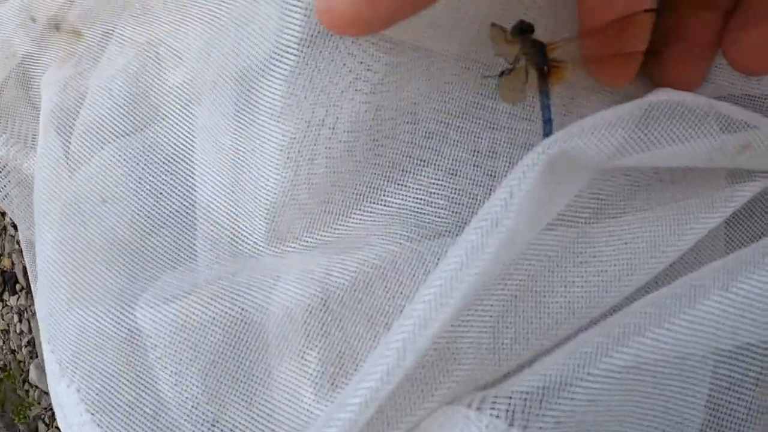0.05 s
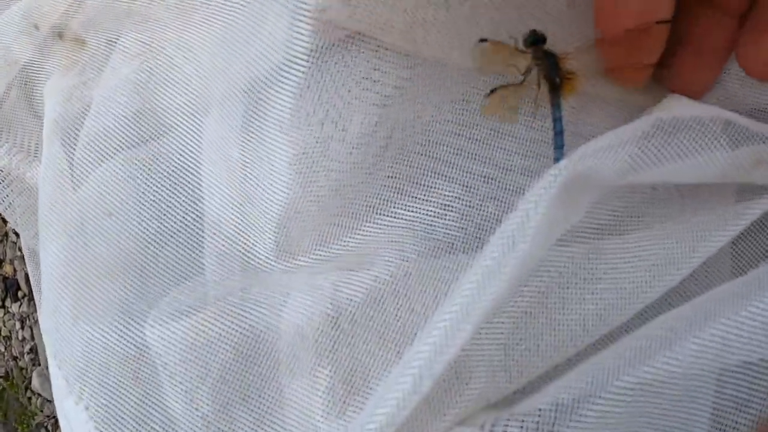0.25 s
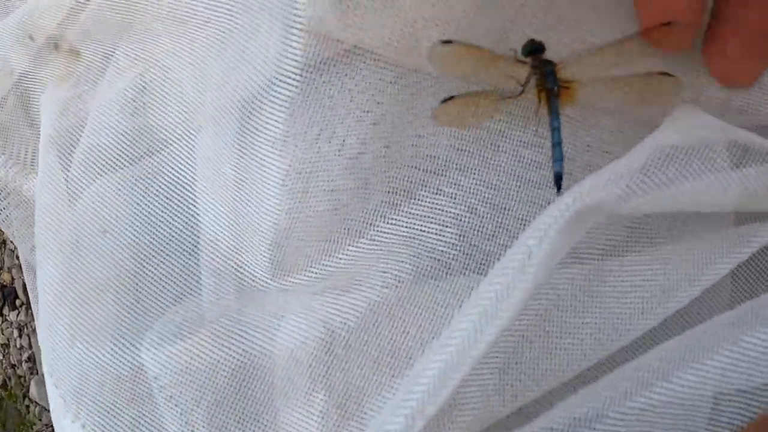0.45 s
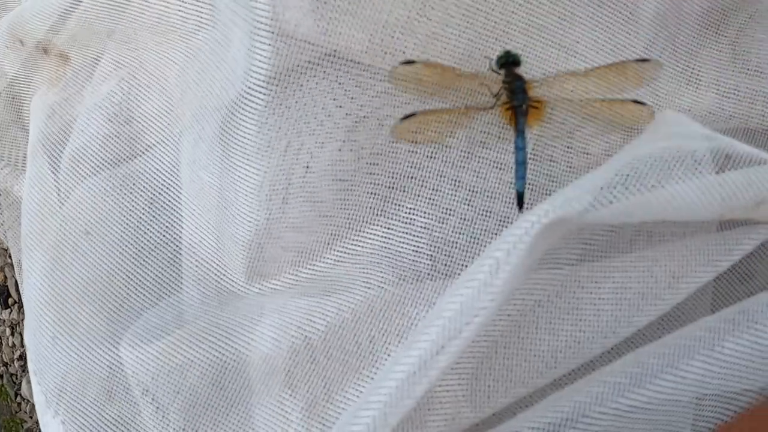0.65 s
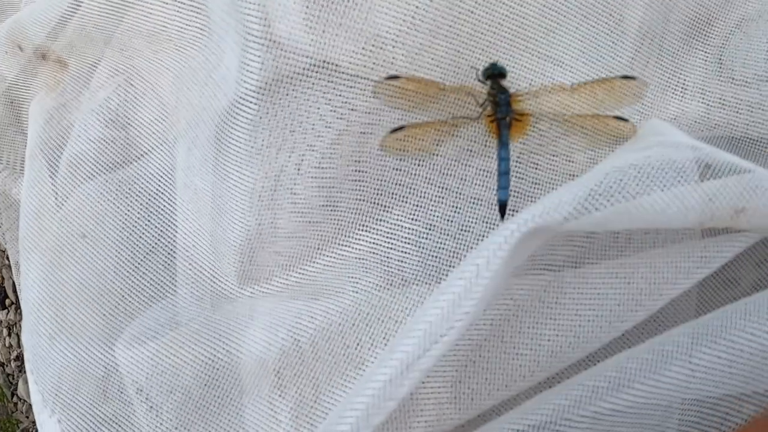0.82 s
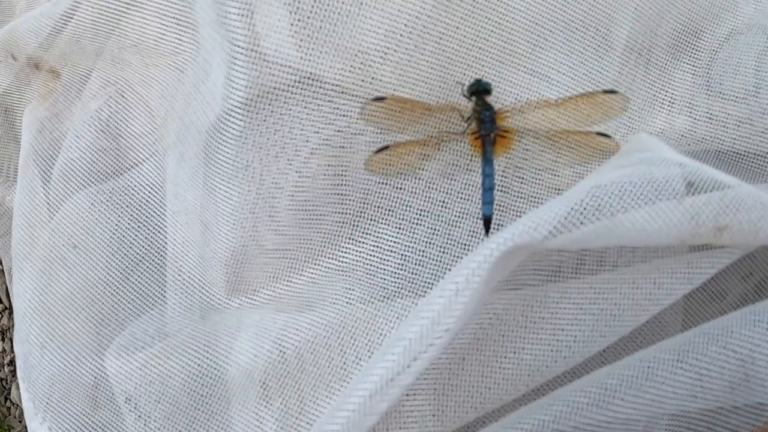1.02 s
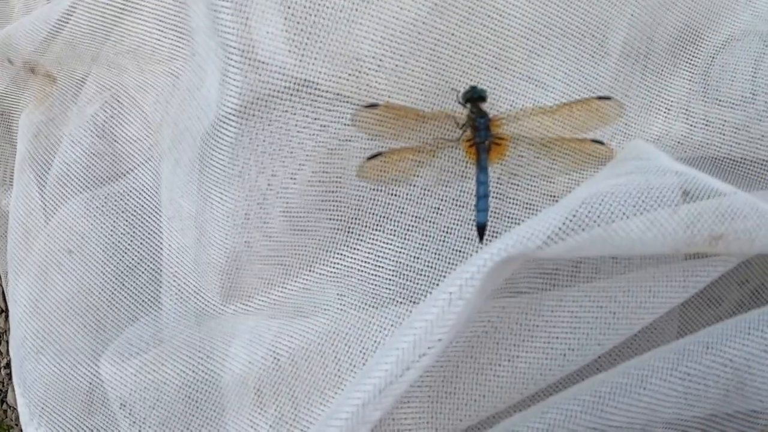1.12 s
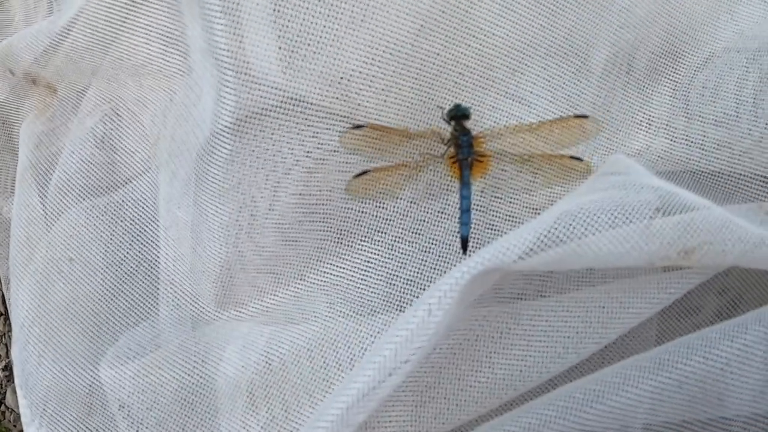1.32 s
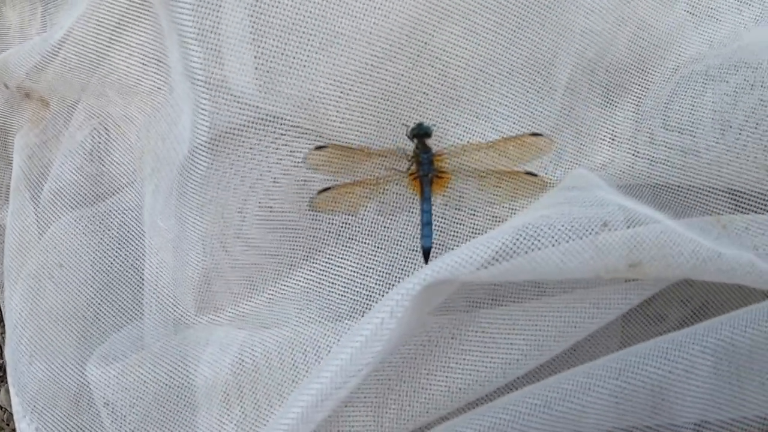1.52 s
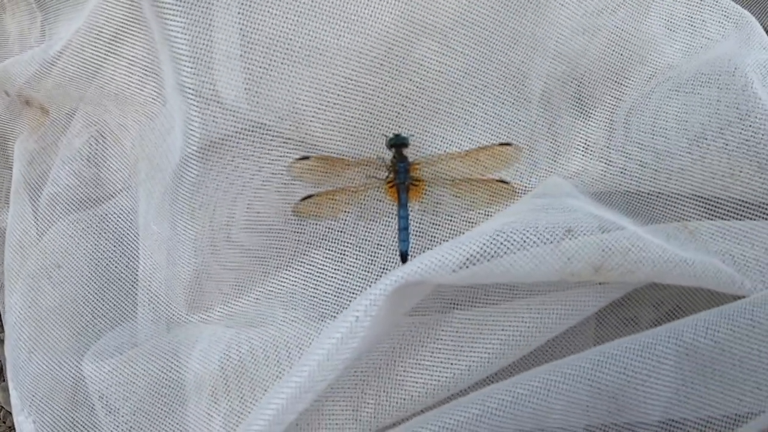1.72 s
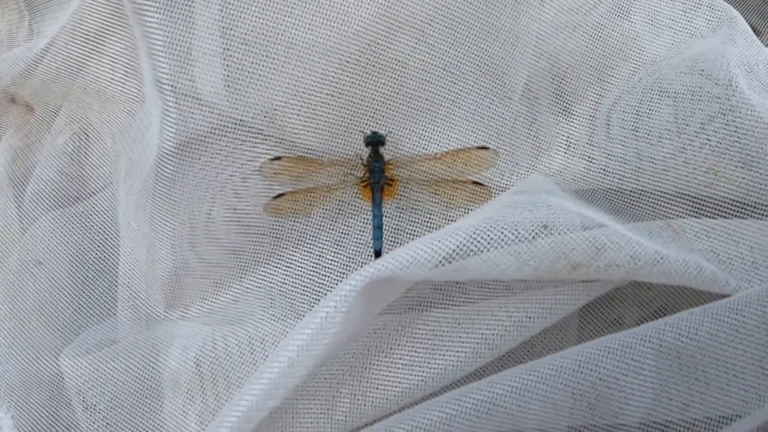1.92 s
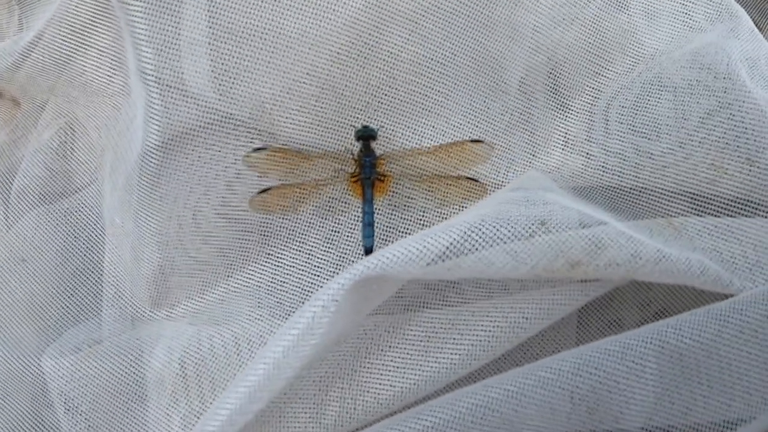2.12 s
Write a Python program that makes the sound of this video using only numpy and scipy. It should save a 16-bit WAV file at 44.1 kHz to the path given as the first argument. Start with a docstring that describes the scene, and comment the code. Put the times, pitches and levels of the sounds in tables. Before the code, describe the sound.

Uneven wind gusts buffet the microphone with a low rumble. Close by, a dragonfly's wings snap and scrape briefly on netting, followed by a few light ticks and a soft creak of the net, with faint outdoor hiss behind.

```python
"""A dragonfly on a mesh net outdoors, close to the camera's stereo microphone. Let go, it gives four
dry wingbeats left of centre, each a snap, a flap of the mesh and a scrape. Gusts rumble and thump
right on the two microphone ports; the held net rustles, ticks and creaks faintly, close by.
Far behind lies a quiet outdoor hiss with two faint falling whistles, perhaps a bird."""
import sys
import numpy as np
from scipy.fft import rfft, irfft, next_fast_len
from scipy.io import wavfile
from scipy.ndimage import uniform_filter1d

SR = 44100
rng = np.random.default_rng(int(sys.argv[2]) if len(sys.argv) > 2 else 0)


def wav_record(signal):
    """Record a signal, one row per channel, as 16-bit PCM in the file named by sys.argv[1]."""
    frames = np.transpose(np.atleast_2d(signal))
    bounded = np.clip(frames, -1, 1)
    # unit amplitude maps onto the largest positive 16-bit level
    quanta = np.round(bounded * 32767).astype(np.int16)
    wavfile.write(sys.argv[1], SR, quanta)


N = 94815

# distant outdoor hiss: time_s, relative_level_db
HISS_LEVELS = [(0.0, -64.5), (1.05, -68), (1.34, -67.5), (1.72, -66), (2.07, -67.5), (2.15, -68)]
# its spectrum: frequency_hz, gain_db
HISS_SPECTRUM = [(100, 14), (300, 10), (500, 8.5), (800, -2), (1200, 2.5), (1700, -3.5), (2400, -5.5),
                 (3100, -4.5), (3700, -7), (4600, -3.5), (5600, -8.5), (7000, -14), (9000, -22),
                 (12000, -34), (15000, -34.5)]
# how alike it is at the two ports: frequency_hz, correlation
HISS_LIKENESS = [(200, 0.14), (600, 0.96), (1200, 0.67), (2500, 0.58), (5000, 0.12), (10000, 0.14)]

# gusts on each microphone port: time_s, relative_rumble_db, relative_eddy_db
LEFT_GUSTS = [(0,-36,-57), (.12,-50,-50), (.27,-31,-48), (.31,-24.5,-36), (.345,-24,-30.5), (.38,-31,-40.5),
              (.45,-20,-32), (.54,-21.5,-32), (.59,-31.5,-49), (.73,-24.5,-37), (.8,-31.5,-54.5),
              (.97,-34,-57), (1.03,-13,-18.5), (1.09,-31,-48), (1.22,-46,-57), (1.36,-40.5,-58),
              (1.45,-31.5,-47), (1.52,-36,-49), (1.62,-40,-50), (1.68,-19,-41.5), (1.73,-42,-60.5),
              (1.86,-40.5,-50), (2.15,-49,-50.5)]
RIGHT_GUSTS = [(0, -46, -53), (0.14, -47.5, -50), (0.27, -35.5, -46.5), (0.33, -40, -28), (0.4, -26, -36),
               (0.47, -32, -28), (0.6, -22, -33), (0.73, -27, -36), (0.81, -31, -50.5),
               (0.85, -25.5, -28.5), (0.89, -33.5, -56), (0.94, -18, -32), (0.97, -34.5, -43),
               (1.0, -25, -23.5), (1.07, -23.5, -25.5), (1.1, -26.5, -46.5), (1.19, -23.5, -51),
               (1.28, -40.5, -54.5), (1.42, -29, -46), (1.46, -29, -29), (1.51, -28.5, -32.5),
               (1.57, -35.5, -50), (1.64, -28.5, -47.5), (1.79, -22.5, -39.5), (1.84, -33, -52.5),
               (1.93, -28.5, -47.5), (1.98, -57, -48.5), (2.07, -34, -42), (2.15, -32, -42.5)]
# spectra of the deep rumble, the faster eddies and the finest eddies: frequency_hz, gain_db
RUMBLE_SPECTRUM = [(10, -29), (25, 3.5), (50, 4), (80, -2), (110, -7.5), (160, -20), (300, -55), (600, -94)]
EDDY_SPECTRUM = [(60, -15), (115, -2.5), (160, -1), (220, -5.5), (300, -16), (450, -50), (700, -69),
                 (1400, -91.5)]
FINE_EDDY_SPECTRUM = [(120, -18.5), (220, -4), (300, 0), (400, -8), (550, -19), (800, -31), (1500, -71)]

# far whistles: start_s, length_s, level_db
FAR_WHISTLES = [(0.125, .085, -74), (.405, 0.07, -74.5)]
# single thumps of wind on the ports: middle_s, level_db, width_s, left_minus_right_db
PORT_BUFFETS = [(0.211, -24, 0.0067, -2), (0.3399, -32, 0.00062, 5), (0.364, -19, 0.0021, -10),
                (0.3941, -14.5, 0.0017, -34), (0.4515, -23, 0.0007, 1.5), (0.4823, -20.5, 0.002, -2),
                (0.501, -30, 0.0015, -18), (0.529, -27, 0.002, -3), (0.6056, -14.5, 0.0013, -45),
                (.632, -29.5, 0.00073, -3), (0.671, -19.5, 0.0012, -23), (0.711, -28.5, 0.0012, -10),
                (.842, -27, 0.0018, -10), (0.937, -18, 0.0017, -28), (0.9548, -23, 0.0013, -37),
                (0.9899, -19, 0.0027, -20), (1.001, -15.5, 0.0013, -25), (1.0129, -19, 0.0019, -6),
                (1.0268, -16.5, 0.00099, -5), (1.0665, -16.5, 0.0013, -25), (1.788, -17, 0.0027, -24),
                (2.072, -26, 0.0025, -22)]

# mesh sliding over mesh: middle_s, half_length_s, level_db
NET_RUSTLES = [(0.311, 0.0016, -66.5), (0.338, 0.0031, -78), (0.53, 0.19, -74), (0.949, 0.012, -68.5),
               (1.032, 0.027, -74)]
# spectrum of the rustle: frequency_hz, gain_db
RUSTLE_SPECTRUM = [(1000, -13), (3000, 10), (5000, 7.5), (8000, 3), (11000, -6.5), (13000, -14),
                   (15000, -15.5)]

# ticks of the net and its frame: start_s, level_db, pitch_hz, decay_s, relative_crack_db, relative_tap_db
NET_TICKS = [(.6253, -56, 3900, .0007, -3, -20), (1.2291, -41, 3950, .00055, -9, -22),
             (1.5283, -51.5, 1700, .002, -11, -11), (1.564, -54, 1900, .002, -13, -16),
             (1.5875, -45.5, 1400, .0014, -12, -9), (1.6168, -54, 1700, .002, -16, -20),
             (1.6355, -46, 1720, .0016, -18, -20), (1.649, -51, 1750, .002, -10, -14),
             (1.9772, -43.5, 1600, .0019, -21, -21)]
# spectra of a tick's crack and dull tap: frequency_hz, gain_db
CRACK_SPECTRUM = [(400, -25), (1000, 3.5), (2500, -1.5), (4500, 6), (6800, -4.5), (11000, -21.5),
                  (14000, -27)]
TAP_SPECTRUM = [(150, -15), (500, 5), (1300, -7.5), (2200, -18), (5000, -43)]

# wings striking the mesh: start_s, snap_db, flap_db, flap_pitch_hz, scrape_db, scrape_decay_s
WING_STRIKES = [(0.6306, -42, -41, 2500, -51, .0035), (0.6702, -45.5, -38.5, 1200, -55.5, .005),
                (0.7095, -68, -58, 1000, -60.5, .007), (0.746, -74, -63, 1000, -64, .008)]
# spectra of a wing's snap and scrape: frequency_hz, gain_db
SNAP_SPECTRUM = [(200, -23), (600, 9.5), (1400, -18), (2500, -16), (4500, -11.5), (7000, -14.5),
                 (12000, -27), (14000, -38)]
SCRAPE_SPECTRUM = [(300, -3), (1000, 6), (2500, 0), (4500, 0.5), (7000, -3.5), (10000, -9), (12800, -15.5),
                   (14000, -30.5)]

# creak of the held net: time_s, level_db
CREAK_LEVELS = [(1.45, -85), (1.54, -71), (1.65, -72), (1.8, -77), (1.92, -88)]
# its spectrum: frequency_hz, gain_db
CREAK_SPECTRUM = [(700, -23), (1300, 2), (1750, -0.5), (2300, 1.5), (3000, -17), (4600, -9.5), (8000, -45),
                  (14000, -53)]

FAR_PAN_DB, NET_PAN_DB, WING_PAN_DB = 2, 3.5, 10  # left minus right


def amp(db):
    """Decibels to gain."""
    return 10 ** (np.asarray(db) / 20)


def unit(x):
    """Scale to rms 1."""
    return x / np.sqrt(np.mean(x ** 2, axis=-1, keepdims=True) + 1e-20)


def along(points, hz):
    """Interpolate (frequency_hz, value) points on a log frequency axis."""
    point_hz, values = np.transpose(points)
    return np.interp(np.log(hz + 1), np.log(point_hz + 1), values)


def since(start_s):
    """Seconds since start_s, for every sample."""
    return np.arange(N) / SR - start_s


def curves(rows):
    """One value per sample for each column after the time."""
    time_s, *columns = np.transpose(rows)
    return [np.interp(since(0), time_s, column) for column in columns]


def pan(db):
    """Left and right gains of unit mean power, the left louder by db."""
    gains = amp(np.array([db, -db]).reshape(2, -1) / 2)
    return gains / np.sqrt(np.mean(gains ** 2, axis=0))


def filtered(x, response):
    """Filter x by a gain given as a function of frequency."""
    size = next_fast_len(N + SR // 2)
    hz = np.fft.rfftfreq(size, 1 / SR)
    return irfft(rfft(x, size) * response(hz), size)[..., :N]


def noise(spectrum, likeness):
    """Coloured stereo noise of rms 1; likeness lists (frequency_hz, left-right correlation)."""
    def mid_side_gains(hz):
        angle = np.arccos(np.clip(along(likeness, hz), -1, 1)) / 2
        return amp(along(spectrum, hz)) * np.array([np.cos(angle), np.sin(angle)])
    mid, side = filtered(rng.standard_normal((2, N)), mid_side_gains)
    return unit(np.array([mid + side, mid - side]))


def grainy(x, depth_db, size):
    """Break a sound into grains about size samples long, at rms 1."""
    flicker = unit(uniform_filter1d(rng.standard_normal(N), size))
    return unit(x * amp(depth_db * flicker))


def burst(start_s, rise_s, fall_s):
    """An envelope with peak 1 that rises and dies away after start_s."""
    t = np.maximum(since(start_s), 0)
    envelope = (1 - np.exp(-t / rise_s)) * np.exp(-t / fall_s)
    return envelope / (envelope.max() + 1e-12)


def turbulence(spectrum, size):
    """Noise evened in strength over about size samples, unrelated from port to port."""
    swirl = filtered(rng.standard_normal((2, N)), lambda hz: amp(along(spectrum, hz)))
    power = uniform_filter1d(uniform_filter1d(swirl ** 2, size), size)
    return unit(swirl / np.sqrt(np.abs(power) + 1e-20))


def outdoor_hiss(trim_db=5):
    """The open air in the distance: a quiet, nearly steady hiss."""
    level_db, = curves(HISS_LEVELS)
    return amp(level_db + trim_db) * pan(FAR_PAN_DB) * noise(HISS_SPECTRUM, HISS_LIKENESS)


def wind(rumble_trim_db=-2.5, eddy_trim_db=-3, strong_gust_db=-27.5):
    """Each port sits in its own gusts; strong ones shed the finest eddies and sound brighter."""
    rumble_db, eddy_db = np.stack([curves(LEFT_GUSTS), curves(RIGHT_GUSTS)], axis=1)
    fine_db = -45 + 1.22 * (eddy_db - strong_gust_db)  # grows more steeply than the larger eddies
    rumble = amp(rumble_db + rumble_trim_db) * turbulence(RUMBLE_SPECTRUM, size=1500)
    eddies = amp(eddy_db + eddy_trim_db) * turbulence(EDDY_SPECTRUM, size=900)
    fine_eddies = amp(fine_db) * turbulence(FINE_EDDY_SPECTRUM, size=700)
    return rumble + eddies + fine_eddies


def far_whistles(from_hz=4450, to_hz=2950):
    """Far off, perhaps a bird: each thin tone swells and fades as it wavers downward."""
    out = np.zeros((2, N))
    for start_s, length_s, level_db in FAR_WHISTLES:
        progress = np.clip(since(start_s) / length_s, 0, 1)
        waver = 0.033 * unit(uniform_filter1d(rng.standard_normal(N), size=60))
        pitch_hz = (from_hz + (to_hz - from_hz) * progress) * (1 + waver)
        tone = np.sin(2 * np.pi * np.cumsum(pitch_hz) / SR)
        out += amp(level_db) * np.sin(np.pi * progress) * grainy(tone, depth_db=3, size=300)
    return pan(FAR_PAN_DB) * out


def buffets(overpressure=1.71, leak_hz=40):
    """A strong eddy hits the ports as one quick swing: suction, then overpressure."""
    out = np.zeros((2, N))
    for middle_s, level_db, width_s, pan_db in PORT_BUFFETS:
        passage = since(middle_s) / width_s
        swing = (passage ** 2 / 2 - 1 + overpressure * passage) / (1 + passage ** 2 / 6) ** 4
        out += amp(level_db) * pan(pan_db) * swing / np.abs(swing).max()
    return filtered(out, lambda hz: 1j * hz / (leak_hz + 1j * hz))  # slow pressure changes leak away


def net_rustle():
    """Close to the microphone, threads slip over each other in short, grainy swishes."""
    strokes = sum(amp(level_db) * np.exp(-(since(middle_s) / half_length_s) ** 2 / 2)
                  for middle_s, half_length_s, level_db in NET_RUSTLES)
    friction = grainy(noise(RUSTLE_SPECTRUM, likeness=[(3000, 0.13)]), depth_db=3, size=40)
    return pan(NET_PAN_DB) * strokes * friction


def net_ticks(rise_s=0.0003, mode_split=0.08):
    """Net and frame tick: a tiny crack, a dull tap and two close, damped modes starting in opposition."""
    crack = noise(CRACK_SPECTRUM, likeness=[(1000, 0.55), (8000, 0.34)])
    tap = noise(TAP_SPECTRUM, likeness=[(1000, 0.46)])
    out = np.zeros((2, N))
    for start_s, level_db, pitch_hz, decay_s, crack_db, tap_db in NET_TICKS:
        phase = 2 * np.pi * pitch_hz * since(start_s)
        ring = np.sin(phase * (1 - mode_split)) - np.sin(phase * (1 + mode_split))
        tick = 0.5 * ring + amp(crack_db) * crack + amp(tap_db) * tap
        out += amp(level_db) * burst(start_s, rise_s, decay_s) * tick
    return pan(NET_PAN_DB) * out


def wingbeats(snap_s=0.00081, flap_s=0.0008):
    """Close on the left, each beat snaps against the mesh and flaps it; the dry wing scrapes over it."""
    snap = noise(SNAP_SPECTRUM, likeness=[(1000, 0.54), (8000, 0.3)])
    friction = noise(SCRAPE_SPECTRUM, likeness=[(1000, 0.46), (8000, 0.1)])
    scrape = grainy(friction, depth_db=2.5, size=24)
    out = np.zeros((2, N))
    for start_s, snap_db, flap_db, flap_hz, scrape_db, scrape_s in WING_STRIKES:
        flap = np.sin(2 * np.pi * flap_hz * since(start_s))
        out += amp(snap_db) * burst(start_s, snap_s / 2, snap_s) * snap
        out += amp(flap_db) * burst(start_s, flap_s / 2, flap_s) * flap
        out += amp(scrape_db) * burst(start_s, scrape_s, scrape_s) * scrape
    return pan(WING_PAN_DB) * out


def net_creak():
    """The held net creaks softly, swelling among its later ticks."""
    level_db, = curves(CREAK_LEVELS)
    creak = grainy(noise(CREAK_SPECTRUM, likeness=[(2000, 0.97)]), depth_db=3, size=130)
    return amp(level_db) * pan(NET_PAN_DB) * creak


def scene():
    """Everything at the microphone, from nearest to farthest."""
    on_the_ports = wind() + buffets()
    close_by = wingbeats() + net_ticks() + net_rustle() + net_creak()
    far_off = outdoor_hiss() + far_whistles()
    return on_the_ports + close_by + far_off


def record(dry):
    """The camera cuts off steeply above its band limit."""
    limit_hz = 14000
    return filtered(dry, lambda hz: 1 / np.sqrt(1 + (hz / limit_hz) ** 60))


dry = scene()
out = record(dry)
wav_record(out)
```